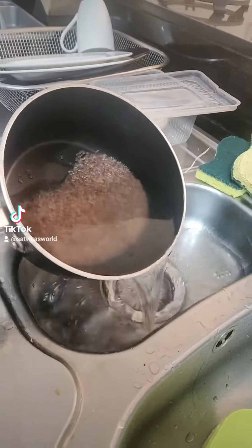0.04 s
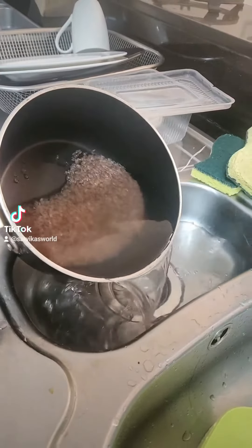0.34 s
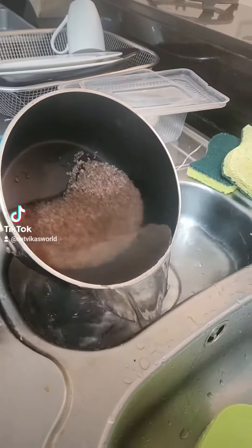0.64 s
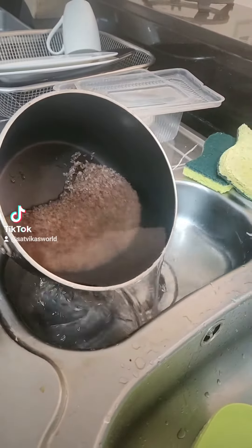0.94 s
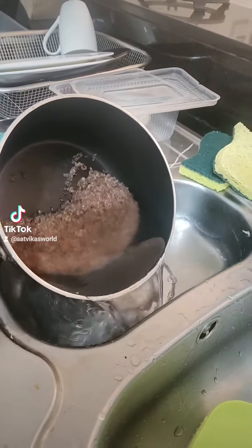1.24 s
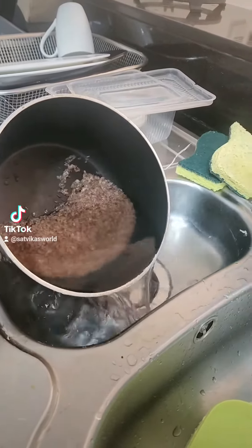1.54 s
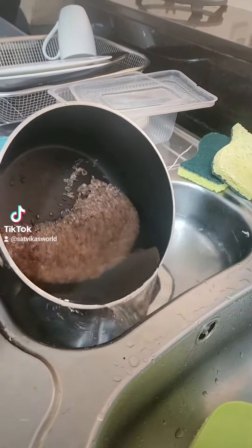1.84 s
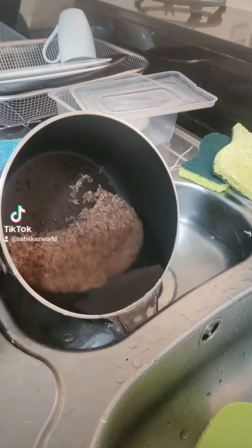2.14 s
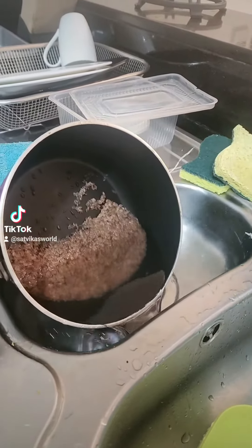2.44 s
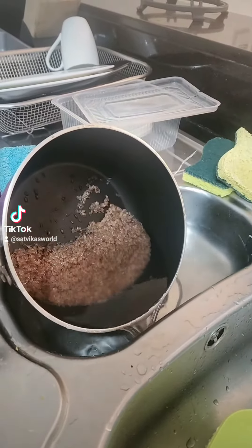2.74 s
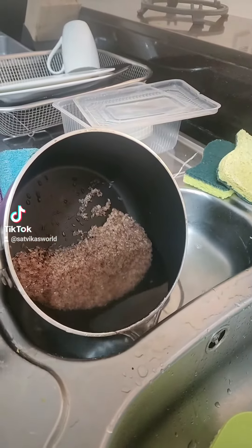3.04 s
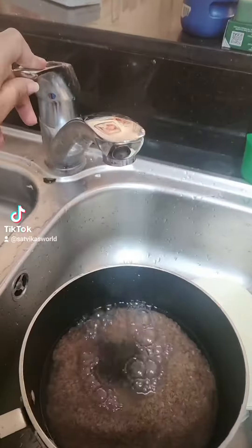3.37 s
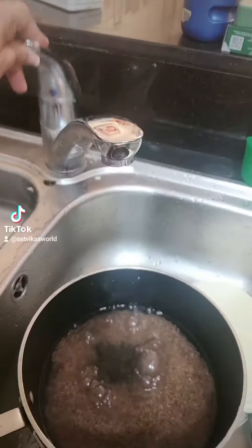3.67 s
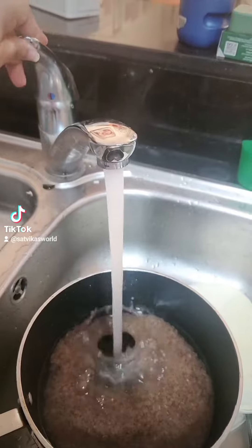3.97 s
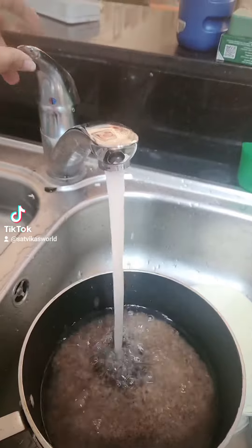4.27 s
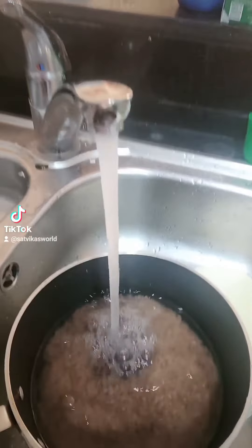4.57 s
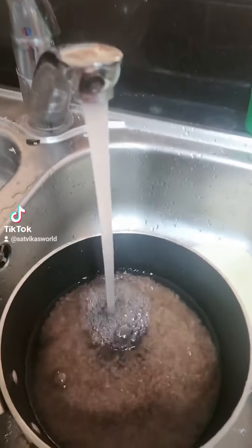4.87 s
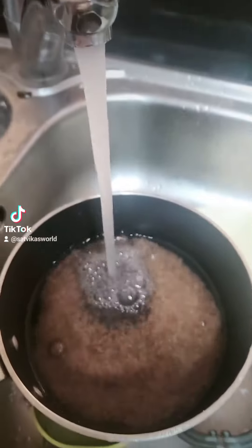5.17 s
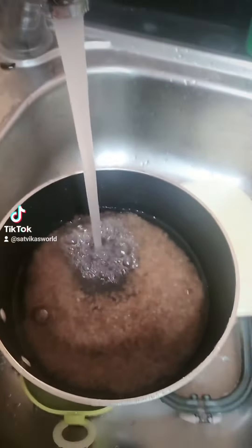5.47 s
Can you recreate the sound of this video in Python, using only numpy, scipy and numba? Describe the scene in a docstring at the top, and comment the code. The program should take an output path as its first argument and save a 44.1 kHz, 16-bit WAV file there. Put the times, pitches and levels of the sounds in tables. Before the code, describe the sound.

Water dribbles and drips into a metal kitchen sink; after a pause, a tap spits air and runs, hissing and bubbling, into a pot.

```python
"""Water trickles in gushes from a tilted pot into a steel sink: bubbles ring, droplets spatter and a few
dull knocks excite the modes of the steel before the last drips fall. After a moment of silence a tap
opens, spits out some air and runs steadily into the water in the pot, whose air resonances colour the
hissing jet and the churning bubbles. A small kitchen with a low rumble surrounds it."""
import sys
import numpy as np
from scipy import signal
from scipy.fft import rfft, irfft
from scipy.io import wavfile
from scipy.ndimage import uniform_filter1d
from numba import njit

SR = 44100
rng = np.random.default_rng(int(sys.argv[2]) if len(sys.argv) > 2 else 0)


def unload_audio(sound):
    """Save the sound as a 16-bit wav file, at the path given as the first command line argument."""
    columns = np.transpose(np.atleast_2d(sound))
    # keep every value between -1 and 1, then stretch to whole-number steps
    steps = np.round(np.clip(columns, -1, 1) * 32767)
    wavfile.write(sys.argv[1], SR, steps.astype(np.int16))


N = 251855
T = np.arange(N) / SR
FREQS = np.fft.rfftfreq(2 * N, 1 / SR) + 1e-3
TOP_HZ = 15800
SILENCE_STARTS_S, SILENCE_ENDS_S = 3.268, 3.425
TAP_OPENS_S, SPURT_S = 3.788, 4.102  # at the spurt, a pocket of air bursts out with a slug of water
AIR_STARTS_S, AIR_RISE_S = 4.005, 0.063  # air from the pipe begins to escape


def amp(db):
    """Amplitude ratio of a level in decibels."""
    return 10 ** (np.asarray(db) / 20)


def unit(x):
    """Normalisation to rms 1."""
    return x / np.sqrt(np.mean(x ** 2))


def pan(db):
    """Interaural level difference: two gains for a pan, which is left minus right in dB."""
    return amp(np.array([[db], [-db]]) / 2)


def colour(x, points, lift_db=0):
    """Spectral shaping by (Hz, dB) points on a logarithmic frequency axis; rms 1."""
    hz, db = np.transpose(points)
    gain = amp(np.interp(np.log(FREQS), np.log(hz), db) + lift_db)
    return unit(irfft(rfft(x, 2 * N) * gain)[..., :N])


def passband(x, hz, kind, order=2):
    """Butterworth filter."""
    sections = signal.butter(order, np.minimum(hz, SR / 2 - 1), kind, fs=SR, output="sos")
    return signal.sosfilt(sections, x)


def fade(t, t60):
    """Exponential decay, 60 dB in t60 seconds."""
    return np.exp(-np.log(1000) * t / t60)


def walk(rate_hz):
    """Slow random modulation with rms 1."""
    steps = rng.standard_normal(1024)
    return unit(np.interp(T * rate_hz, np.arange(len(steps)), steps))


def add(out, s, sound):
    """Superposition of a sound that starts at s seconds."""
    i = max(int(s * SR), 0)
    out[..., i:i + sound.shape[-1]] += sound[..., :max(N - i, 0)]


@njit
def damped_sines(start, hz, cycles, size, glide):
    """Damped oscillators, each rising in pitch while it decays by 60 dB."""
    out = np.zeros(N)
    for k in range(len(start)):
        length, phase = cycles[k] * SR / hz[k], 0.
        for i in range(min(int(length), N - int(start[k]))):
            phase += 2 * np.pi * hz[k] * (1 + glide * i / length) / SR
            out[int(start[k]) + i] += size[k] * np.exp(-6.9 * i / length) * np.sin(phase)
    return out


def cloud(low_hz, high_hz, cycles, spread_db, count, glide=0.29):
    """Incoherent sum of randomly timed bubbles, mostly faint, with a flat overall spectrum."""
    when, pitch, ring, luck = rng.random((count, 4)).T
    hz = low_hz * (min(high_hz, TOP_HZ) / low_hz) ** pitch
    size = hz * amp(-spread_db * np.log(np.maximum(luck, .01)))
    return unit(damped_sines(when * N, hz, cycles * (.5 + ring), size, glide))


def clicks(rows, t60, width=0.21):
    """Impact transients: fast-decaying noise, each burst in its own band."""
    out, t = np.zeros((2, N)), np.arange(SR // 16) / SR
    for s, db, hz, pan_db in rows:
        burst = rng.standard_normal(len(t)) * fade(t, t60)
        tick = passband(burst, [hz / (1 + width), hz * (1 + width)], "band")
        add(out, s, tick / abs(tick).max() * amp(db) * pan(pan_db))
    return out


def kitchen(x, basin_db, room_db, basin_t60=0.045, room_t60=0.3, shared_hz=650):
    """Reverberation: direct sound, quick echoes off the steel, then the room; both ears share the bass."""
    t = np.arange(SR // 2) / SR
    noise = rng.standard_normal((3, len(t)))
    diffuse = passband(noise[:2], shared_hz, "high") + .5 * passband(noise[2], shared_hz, "low")
    basin = fade(t, basin_t60) * (t > .001)
    room = fade(t, room_t60) * (t > .008)
    decay = amp(basin_db) * basin / np.linalg.norm(basin) + amp(room_db) * room / np.linalg.norm(room)
    response = diffuse * decay
    response[:, 0] += 1  # direct path
    return signal.fftconvolve(np.atleast_2d(x), response, axes=1)[:, :N]


# Gushes from the pot. Each row: start and length in seconds, then the levels in dB of large bubbles,
# small bubbles and spatter.
GUSHES = [(0, 0.075, -49.5, -59, -49.5), (0.076, 0.095, -54, -53.5, -48), (0.213, 0.068, -74, -50.5, -52.5),
          (0.428, 0.39, -70, -59, -54.5), (0.832, 0.31, -57, -53, -53), (1.265, 0.46, -57, -56.5, -55.5),
          (1.8, 0.13, -60.5, -57.5, -61), (1.942, 0.28, -54, -62.5, -59.5), (2.378, 0.19, -62, -61, -59.5)]
def gushes(column, dribble_db=-16.5, attack_s=0.0084, sag_db_per_s=19, release_db_per_s=161):
    """Incoherent sources add in power: the gain of gushes that swell, sag and die over a thin dribble."""
    gain = amp(np.mean(np.array(GUSHES)[:, column]) + dribble_db)
    for row in GUSHES:
        start, length = row[:2]
        age = np.maximum(T - start, 0)
        db = row[column] - sag_db_per_s * age - release_db_per_s * np.maximum(age - length, 0)
        gain = np.hypot(gain, amp(db) * np.minimum(age / attack_s, 1))
    return gain


# Spectra of the bubbling and of the spatter. Each row: frequency in Hz, gain in dB.
TRICKLE_SPECTRUM = [(400, -37), (700, -8), (1000, -4.5), (1300, -4.5), (1700, -5.5), (2400, -2.5),
                    (3200, -8), (5000, -8), (8000, -27.5)]
SPATTER_SPECTRUM = [(500, 13), (1200, -24), (3000, 6.5), (5500, 4), (8000, 6.5), (10000, 2), (13000, 8),
                    (16000, 9)]
def trickle(drained_s=2.96, draining_s=0.47, large_below_hz=1700):
    """Air entrainment: the thin stream traps bubbles in the puddle, spatters on bare steel and fizzes."""
    bubbles = colour(cloud(556, 6960, cycles=38, spread_db=4.5, count=3800), TRICKLE_SPECTRUM)
    fizz = amp(-3) * cloud(2500, 16000, cycles=45, spread_db=5, count=4500)
    impacts = cloud(1200, 16000, cycles=0.97, spread_db=4.5, count=7000)
    bubbles = unit(kitchen(bubbles, basin_db=7, room_db=-0.5))
    large = passband(bubbles, large_below_hz, "low", order=3) * gushes(column=2)
    small = passband(bubbles, large_below_hz, "high", order=3) * gushes(column=3)
    spatter = colour(impacts + fizz, SPATTER_SPECTRUM)
    spatter = unit(kitchen(spatter, basin_db=2, room_db=-4, basin_t60=.035))
    wet_hiss = amp(-9) * colour(rng.standard_normal((2, N)), SPATTER_SPECTRUM)
    splash = (spatter + wet_hiss) * gushes(column=4, dribble_db=-9) * pan(-2)
    draining = np.clip((drained_s - T) / draining_s, 0, 1)
    return draining * (large + small + splash)


# Course of the rumble. Each row: time in seconds, base level in dB.
RUMBLE_LEVELS = [(0, -42), (.3, -54.5), (.7, -56.5), (1.2, -61.5), (2.05, -50.5), (2.8, -56), (5.71, -51)]
# Spectra of the room's rumble, drone and hiss. Each row: frequency in Hz, gain in dB.
RUMBLE_SPECTRUM = [(20, -8.5), (35, -9), (50, 4.5), (65, 2.5), (90, -22), (200, -23.5), (1000, -75.5)]
DRONE_SPECTRUM = [(50, -39), (100, -4), (130, -4), (180, -1), (240, -5), (380, -10.5), (600, -30),
                  (1200, -37.5), (4000, -46.5)]
HISS_SPECTRUM = [(300, 7), (900, 10.5), (1400, -1.5), (2400, 5), (3500, -2.5), (5000, 1), (7300, 4),
                 (11000, -8), (13500, 4), (16000, -5)]
def room_tone(waver_db=2.0, lull_ends_s=3.74, lull_fade_s=0.046):
    """Ambient noise: a rumble and a drone, nearly coherent at the two ears, under faint diffuse hiss."""
    mid, side = rng.standard_normal((2, N))
    air = (mid + amp(-15) * side * np.array([[1], [-1]])) * pan(2.1)
    # after the silence the bass is briefly fainter and a thin hiss joins
    after_silence = T > SILENCE_ENDS_S - 0.157
    lull = after_silence * np.clip((lull_ends_s - T) / lull_fade_s, 0, 1)
    rumble_db = np.interp(T, *np.transpose(RUMBLE_LEVELS)) + waver_db * walk(24.04)
    rumble = colour(air, RUMBLE_SPECTRUM) * amp(rumble_db - 20.5 * lull)
    drone = colour(air, DRONE_SPECTRUM) * amp(-58.5 - 7.5 * lull)
    hiss = colour(rng.standard_normal((2, N)), HISS_SPECTRUM) * amp(-73)
    thin_hiss = passband(colour(rng.standard_normal((2, N)), HISS_SPECTRUM), 6900, "high") * amp(-64)
    return rumble + drone + (hiss + after_silence * thin_hiss) * pan(-2)


# Wet slaps. Each row: start in seconds, level in dB, band centre in Hz, length in seconds, pan in dB.
SLAPS = [(0.063, -50.5, 2500, 0.037, 4), (0.106, -55.5, 1870, 0.014, 0), (0.137, -54, 2130, 0.014, -5),
         (0.144, -44.5, 4860, 0.0087, 3), (0.4237, -39.5, 4630, 0.0041, 0), (0.477, -49, 6640, 0.0085, -3),
         (0.663, -55, 2350, 0.024, 5), (.915, -56.5, 2600, 0.0092, 4), (.944, -49.5, 2400, 0.011, 3),
         (1.298, -41, 3020, 0.0095, 2), (1.360, -61, 3230, 0.01, 1), (1.403, -53, 1340, 0.032, 3),
         (1.914, -53.5, 2360, 0.014, 2), (2.137, -56.5, 3660, .016, -5), (2.427, -54, 2430, 0.021, 1),
         (2.655, -70, 1920, 0.056, -1), (4.022, -30, 3200, 0.0037, 0), (4.089, -32, 4400, .006, -1),
         (4.094, -28, 2200, 0.0058, 0), (4.130, -36.5, 3700, 0.01, -2)]
def slaps(width=0.3):
    """Size sets a bubble's pitch: a lump of water breaks into like-sized bubbles that fill one band."""
    out, t = np.zeros((2, N)), np.arange(SR // 5) / SR
    knot = cloud(800, 10000, cycles=12, spread_db=3, count=14000)
    for s, db, hz, length, pan_db in SLAPS:
        i, age = int(s * SR), 2 * t / length
        bubbles = unit(passband(knot[i:i + len(t)], [hz / (1 + width), hz * (1 + width)], "band"))
        add(out, s, bubbles * age * np.exp(1 - age) * amp(db) * pan(pan_db))
    return kitchen(out, basin_db=-12.5, room_db=-7.5)


# The loudest single bubbles. Each row: start in seconds, relative level in dB, starting pitch in Hz,
# pan in dB, ring time in cycles.
BUBBLES = [(.073, -51, 1920, 3, 31), (.090, -37, 3040, -2, 20), (.15, -53, 5000, 3, 26),
           (.226, -36, 2410, -1, 62), (.2555, -36.5, 2500, -1, 88), (0.268, -39, 4010, -3, 59),
           (0.4257, -30.5, 4730, 9, 32), (0.47, -46, 2500, 8, 38), (.579, -44, 4200, -2, 72),
           (.683, -49, 2420, 7, 54), (.726, -47, 2110, 7, 96), (.749, -50, 1870, -5, 69),
           (.922, -49, 2490, 7, 60), (.937, -43, 1015, -4, 45), (0.947, -43, 2380, 5, 62),
           (.955, -43.5, 1010, -2, 28), (.998, -50, 3200, 2.5, 77), (1.042, -46, 3470, -11, 50),
           (1.068, -46, 1186, -2, 40), (1.281, -45.5, 1290, 2, 120), (1.2903, -37, 2410, 9, 82),
           (1.3035, -36.5, 2560, 4.5, 89), (1.304, -31, 3600, -4, 14), (1.362, -43, 1215, 0, 52),
           (1.417, -47, 1330, 0, 34), (1.434, -55, 1220, 4, 40), (1.506, -47.5, 1210, 6, 44),
           (1.581, -48.5, 1670, 9, 50), (1.65, -49, 2480, 10, 41), (1.684, -54, 2350, -3, 50),
           (1.733, -50, 2550, 3, 61), (1.791, -43.5, 2520, 3, 72), (1.96, -44.5, 1110, -4, 12),
           (2.042, -47.5, 882, -9, 86), (2.075, -54, 893, -7, 37), (2.181, -42.5, 2000, -3.5, 32),
           (2.575, -49, 3790, -4, 130), (2.628, -56, 3830, -6, 79), (2.666, -56.5, 3020, 8, 62),
           (4.039, -39, 1260, -2, 160), (4.068, -38, 1290, 0, 81), (4.088, -25, 1267, -6, 74),
           (4.100, -24, 1300, 0, 42), (4.584, -31, 1304, 6, 40), (4.785, -34, 2550, 5, 70),
           (4.837, -36, 1250, -8, 66), (5.007, -35.5, 1275, -8, 45), (5.050, -33, 1303, 6, 54),
           (5.158, -34, 1770, 0, 46), (5.233, -30.5, 1264, -8, 49), (5.310, -38, 1236, -6, 45),
           (5.495, -34.5, 1216, -14, 48), (5.666, -40, 1220, -16, 45)]
# Droplets bursting on steel and water. Each row: start in seconds, relative level in dB,
# band centre in Hz, pan in dB.
DROPLET_TICKS = [(.141, -33, 12400, 12), (.153, -32.5, 12500, -14), (.269, -35.5, 6400, 4),
                 (.2793, -38, 6330, -2), (.600, -36, 12800, -2.5), (.9487, -43, 6120, -3.5),
                 (1.281, -39, 13900, -12), (1.478, -41, 6300, 0), (1.541, -33, 13000, -6),
                 (2.027, -36, 7160, -1.5), (2.429, -35.5, 11700, -6), (2.509, -40, 14300, -17),
                 (5.356, -21.5, 9400, 4.5)]
def drips(glide=0.1, swell_s=0.00044, shed_db=-13, shed_s=.012, shed_octaves=0.144):
    """Bubble resonance: trapped air rings, rises in pitch and sheds fainter bubbles; tiny drops tick."""
    out, t = np.zeros((2, N)), np.arange(SR // 8) / SR
    for s, db, hz, pan_db, cycles in BUBBLES:
        shed = [(s + shed_s * (lag + .5), db + shed_db, hz * 2 ** (shed_octaves * detune))
                for lag, detune in rng.standard_normal((3, 2))]
        for start, level_db, pitch in [(s, db, hz)] + shed:
            t60 = cycles / pitch
            phase = 2 * np.pi * np.cumsum(pitch * (1 + glide * np.minimum(t / t60, 1))) / SR
            ring = np.sin(phase) * fade(t, t60) * (1 - np.exp(-t / swell_s))
            add(out, start, ring / ring.max() * amp(level_db) * pan(pan_db))
    ticks = clicks(DROPLET_TICKS, t60=.005)
    return kitchen(amp(-3) * (out + ticks), basin_db=-2, room_db=-8)


# Finger taps. Each row: start in seconds, peak level in dB, lower and upper band edge in Hz, pan in dB.
FINGER_TAPS = [(.541, -58, 300, 980, -22), (0.5868, -38, 230, 1180, -23), (2.3752, -51.5, 330, 1630, -22),
               (2.379, -48.5, 300, 1370, -28)]
def finger_taps():
    """Direct field: fingers tap so near the listener that each band-limited impulse arrives dry."""
    out, push = np.zeros((2, N)), signal.unit_impulse(2048)
    for s, db, low_hz, high_hz, pan_db in FINGER_TAPS:
        tap = passband(push, [low_hz, high_hz], "band", order=4)
        add(out, s, tap / abs(tap).max() * amp(db) * pan(pan_db))
    return out


# Modes of the sink. Each row: frequency in Hz, relative level in dB, free decay time (t60) in seconds.
SINK_MODES = [(113, 6, 0.13), (154.5, 0, 0.13), (225, -10.5, 0.29), (318.5, -1.5, 0.16), (364, 3, 0.036),
              (406, -14, 0.27), (480, -2, 0.14), (549, -12, 0.15), (656.5, -10, 0.27), (792, -6.5, 0.16),
              (840, -7.5, 0.17), (899, -7, 0.19), (1001, -15, 0.17), (2300, -26, 0.315)]
# Knocks on the sink. Each row: start in seconds, direct peak level in dB, frequency in Hz that the
# contact favours, fraction of the free decay time, pan in dB.
KNOCKS = [(.8515, -21, 490, 0.21, -4), (.858, -21.5, 340, 0.94, 1.5), (.8705, -36, 350, 0.78, -6),
          (2.4248, -31, 1000, 0.45, -9), (2.430, -36, 880, 0.16, 15), (4.098, -26, 760, 1, 1.5),
          (4.293, -28, 670, 0.16, -5)]
def knocks(thud_db=-13, thud_t60=0.16, linger_db=-36, linger_t60=1.18):
    """Modal vibration: dull blows ring the wet sink over a broad thud, and the steel lingers faintly."""
    out, t = np.zeros((2, N)), np.arange(SR) / SR
    for s, db, contact_hz, free_share, pan_db in KNOCKS:
        ring = 0
        for k, (hz, mode_db, t60) in enumerate(SINK_MODES):
            decay = fade(t, t60 * free_share) + amp(linger_db) * fade(t, linger_t60)
            ring = ring + (-1) ** k * amp(mode_db) * np.sin(2 * np.pi * hz * t) * decay
        ring = passband(ring, contact_hz * 0.93, "high")
        ring = passband(ring, contact_hz * 1.29, "low", order=3)  # a soft contact spares the high modes
        thud = passband(rng.standard_normal((2, len(t))), [contact_hz * 0.43, contact_hz * 1.06], "band")
        blow = ring / abs(ring).max() + amp(thud_db) * unit(thud) * fade(t, thud_t60)
        add(out, s, blow / abs(blow).max() * amp(db) * pan(pan_db))
    return kitchen(out, basin_db=-7.5, room_db=-11, room_t60=0.42)


# Lever clicks. Each row: start in seconds, direct peak level in dB, band centre in Hz, pan in dB.
LEVER_CLICKS = [(3.428, -55, 7700, -6), (3.486, -38.5, 14150, -14), (3.520, -39.5, 13900, -18)]
def lever():
    """Direct sound dominates near a source: the tap lever clicks almost dry as it is gripped."""
    return kitchen(clicks(LEVER_CLICKS, t60=.006, width=.12), basin_db=-8, room_db=-14)


def flow(opening_s, overshoot_db=5, settling_s=.23):
    """Starting transient: the tap's flow rises evenly, overshoots around the spurt and settles at 1."""
    opening = np.clip((T - TAP_OPENS_S) / opening_s, 0, 1)
    return opening * amp(overshoot_db * np.exp(-((T - SPURT_S) / settling_s) ** 2))


def spurt(start_s, rise_s, fall_s, lift_db):
    """Exponential relaxation: a gain rises, holds until the spurt and falls back to 1."""
    shape = np.clip((T - start_s) / rise_s, 0, 1) * np.exp(-np.maximum(T - SPURT_S, 0) / fall_s)
    return 1 + (amp(lift_db) - 1) * shape


# Air modes of pot and basin. Each row: frequency and width in Hz, lift in dB, pan in dB.
POT_MODES = [(160.3, 28, 8, 5.5), (446, 33, 4.5, -10), (640, 25, 1.5, 2), (760, 100, 4, -3.5),
             (1250, 200, 4.5, -13.5), (1353, 220, 6.5, 11.5), (1893, 280, 5, 10.5), (2540, 90, 3.5, 5),
             (3100, 43, -1, 6)]
def pot_resonance():
    """Cavity resonance: each air mode adds a bell-shaped curve to the gain in dB, left and right."""
    return sum((db + np.array([[.5], [-.5]]) * pan_db) / (1 + (2 * (FREQS - hz) / width) ** 2)
               for hz, width, db, pan_db in POT_MODES)


# Spectrum of the jet. Each row: frequency in Hz, gain in dB.
JET_SPECTRUM = [(400, -4), (1300, -15), (2500, 1.5), (3300, -0.5), (4600, 4), (6500, 2), (8000, 4),
                (10000, -2), (12500, 5.5), (16000, 2.5)]
# Air spat from the tap. Each row: start in seconds, level in dB, length in seconds, pan in dB.
AIR_SPITS = [(4.004, -31, 0.013, 1), (4.022, -27, 0.006, 10.5), (4.041, -24, 0.0073, -7),
             (4.052, -33, 0.0063, -5), (4.088, -22.5, 0.0095, -2), (4.096, -22, 0.017, -8),
             (4.169, -32.5, 0.01, -9)]
def jet(steady_db=-42.5, flutter_db=1.0, beam_db=10.5, beam_hz=11000):
    """Turbulent noise: the aerated jet hisses and sprays, and trapped air bursts out as the flow builds."""
    escaping_air = spurt(AIR_STARTS_S, AIR_RISE_S, fall_s=0.04, lift_db=13)
    strength = flow(opening_s=0.1) * escaping_air * amp(steady_db + flutter_db * walk(45))
    for s, db, length, pan_db in AIR_SPITS:
        age = np.maximum(T - s, 0) / length * 2
        strength = np.hypot(strength, amp(db) * age * np.exp(1 - age) * pan(pan_db))
    droplets = cloud(2270, 16000, cycles=5, spread_db=4.5, count=5000)
    spray = amp(-7) * unit(kitchen(droplets, basin_db=-13, room_db=4))
    # the highest hiss beams towards the right
    beam = np.array([[-.5], [.5]]) * beam_db / (1 + (beam_hz / FREQS) ** 8)
    return strength * colour(rng.standard_normal((2, N)) + spray, JET_SPECTRUM, beam + pot_resonance())


# Spectrum of the churning water. Each row: frequency in Hz, gain in dB.
CHURN_SPECTRUM = [(60, -21), (110, 0), (300, 2), (800, 4.5), (1100, 0.5), (1600, -2.5), (2400, -1),
                  (4000, -2), (6500, -7), (12000, -1)]
def churn(steady_db=-40.5, first_water_db=-14, surge_db=1.5, crossover_hz=850, plunge_s=0.012):
    """Source and filter: the jet drives bubbles under the surface and the pot's hollow colours them."""
    bubbles = cloud(97.7, 8930, cycles=13.6, spread_db=3.5, count=20000)
    wash = amp(-3) * rng.standard_normal((3, N))
    # the bass comes straight, the rest after many reflections in the pot
    straight = passband(bubbles + wash[2], crossover_hz, "low")
    echoes = unit(kitchen(bubbles, basin_db=9, room_db=0))
    scattered = passband(echoes + wash[:2], crossover_hz, "high")
    water = colour(straight + scattered, CHURN_SPECTRUM, pot_resonance())
    before_spurt = np.clip((SPURT_S - T) / plunge_s, 0, 1)
    slug = spurt(SPURT_S - plunge_s, plunge_s, fall_s=0.0064, lift_db=13)
    level_db = steady_db + first_water_db * before_spurt + surge_db * walk(18)
    return water * flow(opening_s=0.032) * slug * amp(level_db)


def froth(pop_db=-54, clump_db=1.7, glug_db=-51):
    """Larger bubbles resonate lower: small ones pop around the jet, big ones ring in tune with the pot."""
    small = cloud(1700, 3200, cycles=26, spread_db=3.2, count=1300)
    pops = unit(kitchen(small, basin_db=2, room_db=-3))
    large = cloud(1190, 1350, cycles=50, spread_db=3, count=330, glide=.06)
    glugs = unit(kitchen(large, basin_db=9, room_db=-3))
    water = pops * amp(pop_db + clump_db * walk(16)) + glugs * amp(glug_db) * pan(-3)
    return water * np.clip((T - AIR_STARTS_S) / AIR_RISE_S, 0, 1)


# Thumps on the pot's bottom. Each row: start in seconds, level in dB, frequency in Hz, t60 in seconds.
THUMPS = [(4.099, -31.5, 174.8, 0.32), (5.141, -36, 157, 0.046), (5.329, -42, 147, 0.21)]
def thumps():
    """Damped free vibration: surges of the jet set the water-laden pot booming."""
    out, t = np.zeros((2, N)), np.arange(SR // 2) / SR
    for s, db, hz, t60 in THUMPS:
        add(out, s, amp(db) * np.sin(2 * np.pi * hz * t) * fade(t, t60))
    return out


def scene():
    """Superposition: the pot drains, then the tap runs, over the noise of the room."""
    poured_water = trickle() + slaps() + drips()
    handling = knocks() + finger_taps() + lever()
    running_tap = jet() + churn() + froth() + thumps()
    return poured_water + handling + running_tap + room_tone()


def record(dry):
    """Gating and band limiting: silence parts the pouring from the tap, and the top is cut steeply."""
    audible = (T < SILENCE_STARTS_S) | (T > SILENCE_ENDS_S)
    gate = uniform_filter1d(1. * audible, size=64)
    lowpass = signal.ellip(12, .1, 80, TOP_HZ, fs=SR, output="sos")
    return signal.sosfilt(lowpass, dry * gate)


dry = scene()
out = record(dry)
unload_audio(out)
```